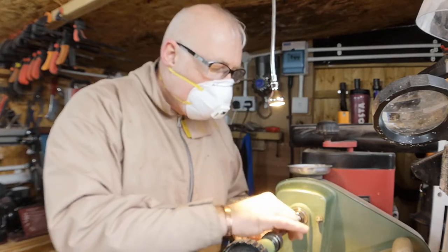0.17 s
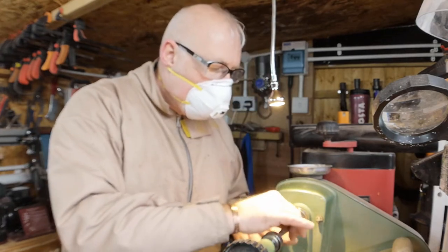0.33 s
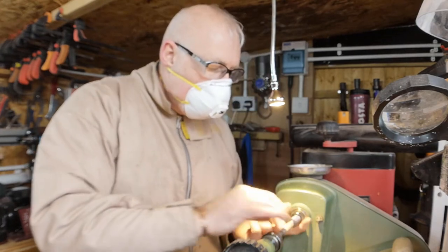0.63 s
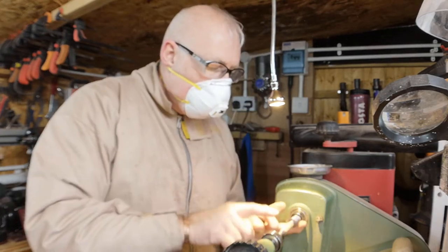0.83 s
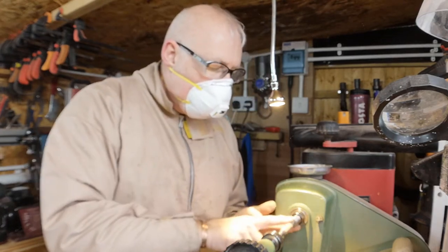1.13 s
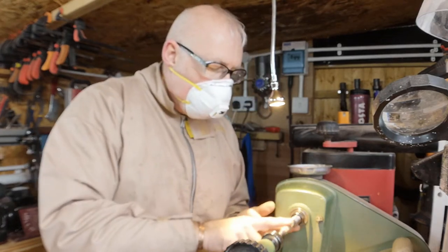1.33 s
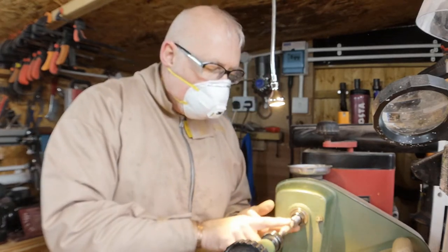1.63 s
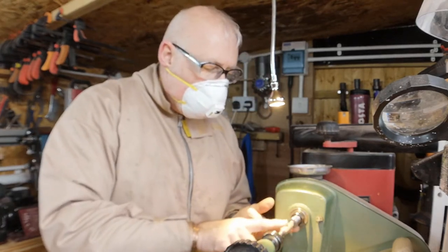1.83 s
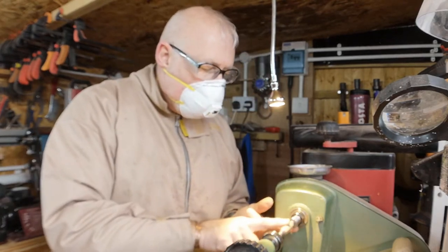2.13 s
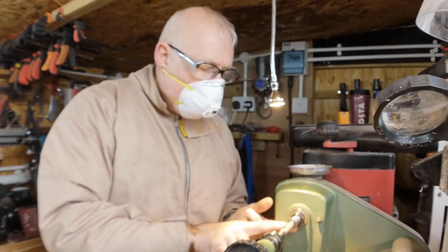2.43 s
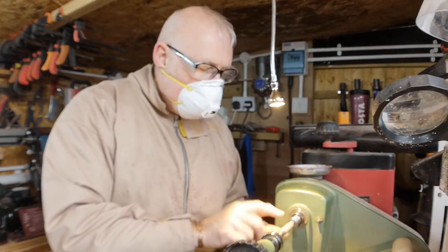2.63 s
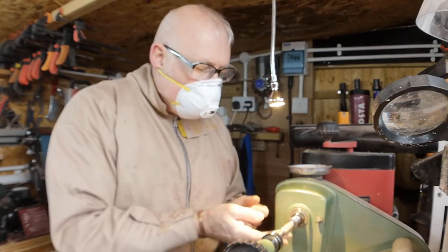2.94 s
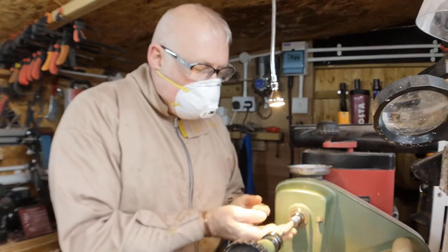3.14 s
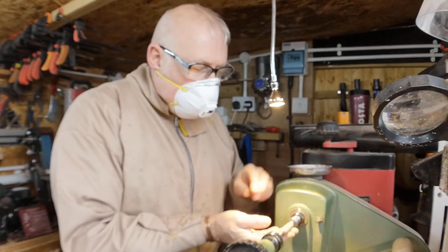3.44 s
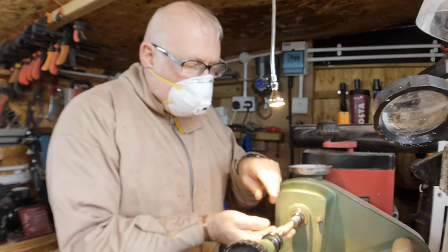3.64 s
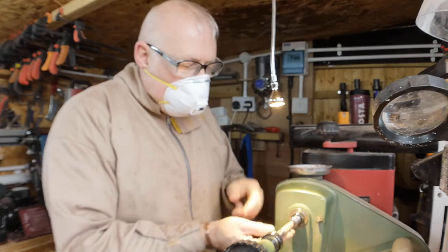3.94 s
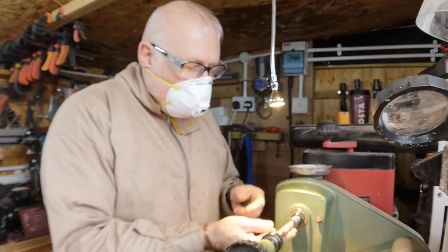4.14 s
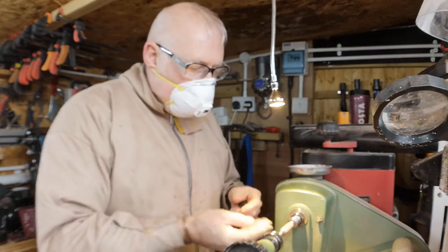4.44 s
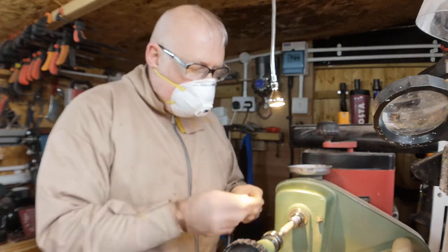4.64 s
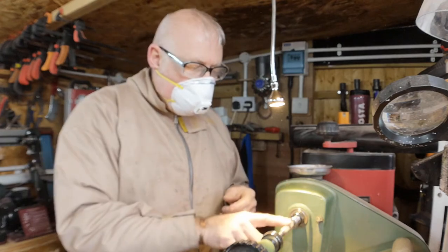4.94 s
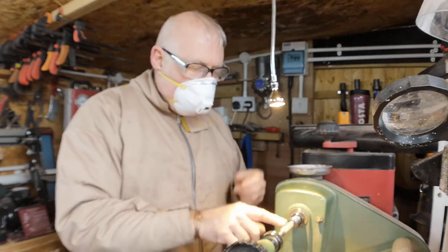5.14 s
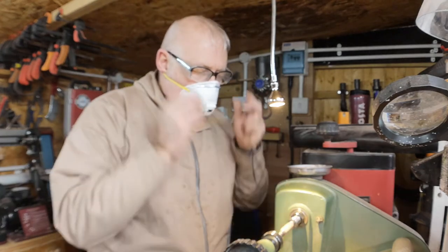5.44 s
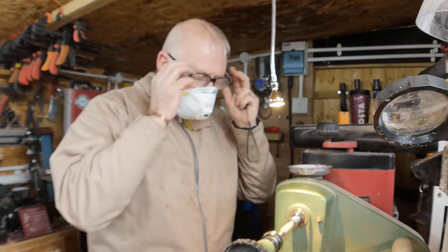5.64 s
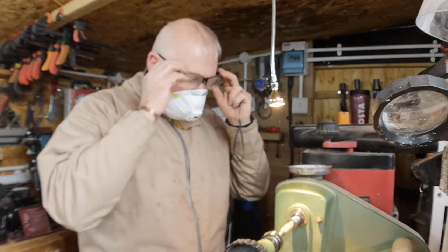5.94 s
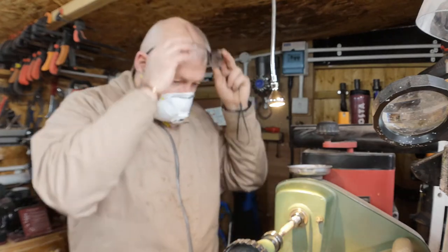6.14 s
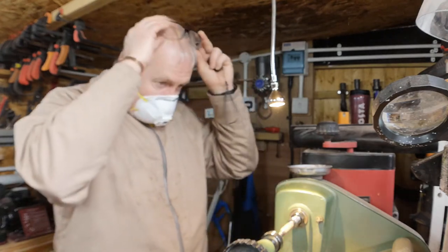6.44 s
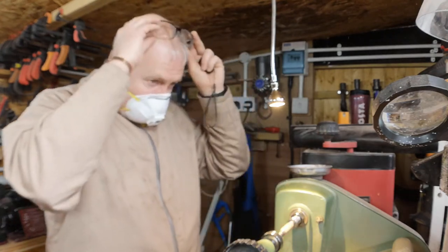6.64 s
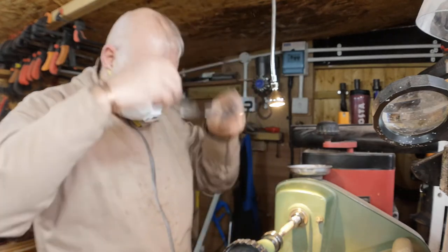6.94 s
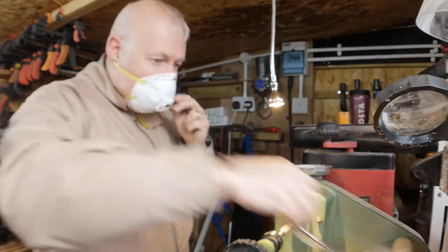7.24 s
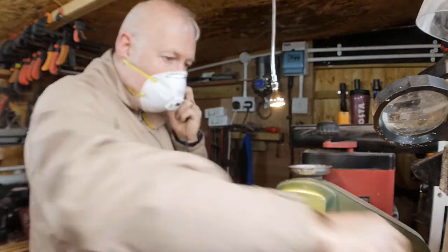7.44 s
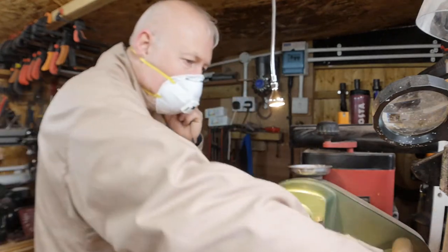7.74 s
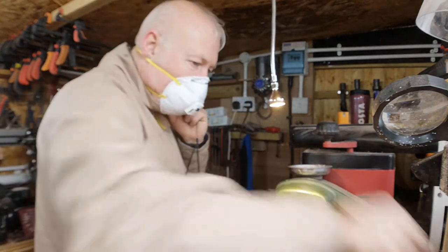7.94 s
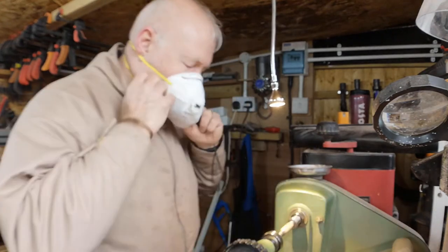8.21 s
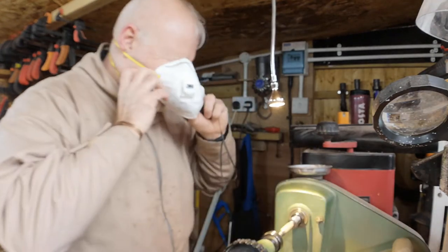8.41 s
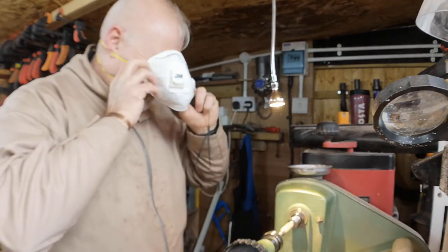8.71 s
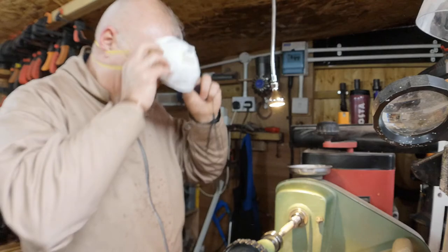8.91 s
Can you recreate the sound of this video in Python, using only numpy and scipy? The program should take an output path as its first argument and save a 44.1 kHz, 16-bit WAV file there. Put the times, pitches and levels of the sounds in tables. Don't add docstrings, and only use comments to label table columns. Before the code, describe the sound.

Quiet workshop: fingers faintly rub wood, a light tap, then spectacles come off, snap shut sharply and clatter onto a bench with dull bumps.

```python
import sys
import numpy as np
from scipy import signal
from scipy.io import wavfile

SR = 44100
rng = np.random.default_rng(int(sys.argv[2]) if len(sys.argv) > 2 else 0)


def digitize_waveform(pressure):
    field = np.atleast_2d(pressure).T
    bounded = np.clip(field, -1, 1)
    quanta = np.round(bounded * 32767).astype(np.int16)
    wavfile.write(sys.argv[1], SR, quanta)


def magnitude_from_level(level_db):
    exponent = np.asarray(level_db, float) / 20
    return 10 ** exponent


N = 399972

RUB_ZONES_HZ = [600, 2100, 7000, 13000]
# hz, level_db (per Hz)
RUB_COLOUR = [(150, -20), (250, -8), (400, -6.5), (640, -15), (922, 4.5), (1020, -8), (1120, -8.5),
              (2490, -1), (2910, -0.5), (3710, -14), (4050, 0.5), (8120, 5), (11700, -34), (13300, -26),
              (14600, -17), (15100, -19), (16000, -46)]
# hz, width_hz, level_db
HOUSING = [(1683, 204, 3), (3350, 47, -2), (3775, 71, 5.5), (5330, 200, 4), (5900, 190, 3), (7730, 340, 5)]
# time_s, level_db
SLEEVES = [(0, -72), (.35, -80), (1.25, -74), (1.6, -81.5), (2.8, -86.5), (2.97, -70.5), (3.3, -86),
           (3.5, -69.5), (3.9, -78.5), (4.06, -70), (4.4, -78.5), (5.2, -80), (5.5, -66), (6.25, -73.5),
           (6.7, -79), (7.6, -73), (8.14, -66), (9.07, -72)]
SLEEVE_ZONES_DB = [-7, 0, -3.5, -19]
# top_s, length_s, level_db
PASSES = [(.1, 0.17, -72.5), (.27, 0.15, -74), (0.437, .17, -73.5), (0.592, .22, -73.5), (1.27, 0.2, -74.5),
          (1.4, .12, -77.5), (1.52, .13, -76), (1.64, .13, -79), (1.77, .14, -79), (1.926, .16, -79),
          (2.06, .12, -79), (2.18, 0.14, -80), (2.32, .17, -80), (2.488, .16, -77.5), (2.95, .1, -77),
          (3.07, .13, -72), (3.226, 0.16, -75.5), (3.37, .11, -74.5), (3.507, .15, -69.5),
          (3.636, .14, -69.5), (3.78, .15, -72), (3.93, 0.14, -75.5), (4.03, 0.15, -72), (4.25, 0.1, -76.5),
          (4.43, .15, -73), (4.84, .16, -82), (4.99, .1, -80), (5.093, .11, -76), (5.198, .1, -79),
          (5.52, .3, -72)]
PASS_ZONES_DB = [-22, -10, 0, -10.5]
# start_s, length_s, level_db, brightness_db
STROKES = [(5.71, .13, -54.5, -13), (5.906, 0.09, -47, -3), (5.925, .085, -53.5, 0), (6.965, .045, -61, 1),
           (6.98, 0.082, -65, 7), (7.05, 0.077, -76.5, 9.5), (7.26, .05, -81.5, 10.5),
           (7.46, .11, -75, 9.5), (7.53, .15, -78, 10.5), (7.97, 0.11, -66.5, 5.5), (8.06, 0.087, -62, -1),
           (8.28, .06, -65, 1.5), (8.35, .085, -62, 8.5), (8.45, .1, -66, 6), (8.675, .12, -77, 9),
           (8.8, 0.058, -61, -5.5), (8.885, .17, -59, -.5)]
# start_s, length_s, level_db, brightness_db
DRAGS = [(2.93, .09, -72, -4), (5.76, 0.079, -67, 1), (7.672, 0.06, -60, -14), (7.703, 0.09, -51, -6),
         (7.772, 0.09, -48, 0), (7.81, .07, -56, -1), (7.84, .06, -66, 4), (7.985, .045, -63, 3),
         (7.886, 0.022, -50, -11), (7.905, 0.13, -51.5, -7), (8.62, 0.082, -55, -6.5), (8.99, .13, -68, 1)]
# start_s, length_s, pitch_hz, level_db
SQUEAKS = [(.0, .152, 5900, -75), (.34, .34, 5750, -74.5), (1.55, 1.0, 7630, -84.5),
           (2.416, .114, 7600, -80), (2.94, .05, 3400, -70), (3.543, .135, 7600, -80),
           (4.40, .046, 5070, -78), (4.37, .12, 7600, -79), (4.45, .03, 5500, -74),
           (5.052, .068, 11200, -84), (5.855, .04, 2250, -68), (6.82, .039, 2600, -75),
           (7.7, .08, 5930, -58), (7.8, .05, 920, -52), (7.8, .045, 1260, -53), (5.93, .05, 1150, -56),
           (5.76, .04, 980, -64), (7.16, .035, 850, -66)]
# start_s, length_s, centre_hz, level_db
SCUFFS = [(3.447, .116, 3500, -70.5), (5.755, .075, 2400, -55), (5.756, 0.086, 484, -66),
          (5.91, .082, 430, -55), (5.918, .075, 3600, -50), (5.92, .06, 2800, -52), (5.93, .055, 5300, -54),
          (5.765, .07, 5900, -62), (7.91, .035, 5200, -52), (7.755, .035, 2300, -55),
          (7.715, .075, 4600, -60), (7.885, .025, 6200, -58), (8.34, .1, 800, -74), (5.99, .05, 2600, -66),
          (7.76, .03, 10000, -62), (8.32, .2, 9400, -71), (8.42, .06, 7000, -68), (8.62, .16, 9100, -68),
          (8.87, .11, 9400, -72), (8.86, .06, 1500, -68), (8.68, .13, 430, -76), (8.36, .04, 2600, -62),
          (8.93, .12, 900, -68), (7.65, .04, 7800, -68), (3.03, .06, 2800, -73), (6.985, .065, 4800, -63),
          (7, .06, 3600, -66), (6.995, .05, 6800, -66), (7.79, .06, 1500, -59), (8.087, .023, 2700, -58.5),
          (8.485, 0.065, 924, -69), (8.629, .061, 319, -53.5), (8.93, .041, 970, -62),
          (7.154, 0.03, 14000, -45), (7.91, .026, 3180, -45), (8.366, .049, 5600, -62),
          (5.448, .246, 5600, -72.5)]

# time_s, peak_db, left_right_db
TAP = [
    (0.913, -34, -3),
]
# hz, level_db (per Hz)
TAP_COLOUR = [(150, -37), (250, -4), (559, -29), (829, -13), (1250, -24), (1670, -6), (2060, -7),
              (2610, -1.5), (3100, -12.5), (5650, -13), (6370, -20.5), (15000, -42)]
# pitch_hz, level_db, t60_s
TAP_MODES = [(800, -12, .11), (880, -12, .11), (1640, -10, .1), (1750, -6, .11), (2600, 0, .09),
             (2720, 1, .11), (3280, -9, .07), (5420, -9, .1), (5750, -8, .11), (6050, -12, .1),
             (7680, -14, .08)]
# time_s, peak_db, left_right_db
SNAP = [
    (7.156, -13.5, -2.5),
]
# hz, level_db (per Hz)
SNAP_COLOUR = [(180, -53), (300, -22.5), (378, -19), (599, -43), (846, -23), (1430, -22.5), (2090, -15),
               (2270, -26), (3660, -1.5), (4530, -16), (5700, 0), (9040, -2), (15300, -27)]
# pitch_hz, level_db, t60_s
SNAP_MODES = [(2090, -15, .08), (3700, -3, .16), (3790, -9, .12), (5550, -8, .12), (5680, -2, .15),
              (5930, -7, .12), (6650, -1, .1), (7170, -12, .09), (7800, 0, .09), (8050, -9, .11),
              (8860, -5, .07), (9350, -9, .07)]
RING_DB = {"tap": -5.5, "snap": -20}
# time_s, peak_db, left_right_db
DROP = [
    (7.907, -22, -6),
]
# hz, level_db (per Hz)
DROP_COLOUR = [(150, -21), (250, 8), (397, -3.5), (522, -8), (652, -1.5), (1650, -3.5), (4440, -20.5),
               (8520, -19.5), (10100, -38), (15000, -35.5)]
# pitch_hz, level_db, t60_s
DROP_MODES = [(517, 1.5, 0.1), (861, -6, .1), (1130, -4, 0.09), (1604, 0.5, 0.055), (2034, -2, 0.072),
              (2925, -7, 0.072), (4060, -20, 0.13), (5900, -18, 0.12), (7644, -24, 0.081),
              (7900, -31, 0.23), (8200, -13, 0.12)]
# time_s, peak_db, centre_hz, left_right_db
TICKS = [(1.929, -61, 1830, 10), (5.439, -49.5, 1390, 6), (5.86, -47, 2110, -4.0), (6.743, -56.5, 2200, 0),
         (6.791, -66, 5500, -12), (6.815, -53, 2900, -7), (6.842, -65, 7400, -12), (6.903, -54, 2700, -4),
         (6.968, -48, 4900, -9), (7.269, -59, 7890, 1), (7.668, -66, 918, -6.5), (7.688, -46, 1670, -7),
         (7.707, -45, 1700, -8), (7.721, -47, 1300, -8), (7.784, -45, 2960, -5), (7.887, -36, 1500, -6),
         (8.633, -50, 1560, -1), (8.646, -50, 1920, -8), (8.949, -54, 935, 1), (5.7747, -39, 2050, -1.5),
         (5.925, -45, 2900, -3.5), (6.968, -50, 2600, -7), (7.914, -38, 1300, -4), (7.925, -31, 1800, -4),
         (7.933, -36, 2500, -4), (8.01, -50, 1800, -4), (7.668, -61, 2400, -5), (4.007, -66, 4500, -3)]
# time_s, peak_db, pitch_hz, t60_s
PINGS = [(8.623, -59, 3750, .03), (8.632, -46, 1600, .04), (8.633, -55, 2800, .04), (8.644, -49, 2750, .06),
         (8.645, -46, 1950, .045), (8.648, -56, 3850, .03), (8.656, -49, 2000, .035),
         (8.664, -52, 1450, .04), (8.67, -48, 3780, .025), (8.682, -61, 1900, .04), (6.745, -67, 2300, .08),
         (6.79, -63, 5450, .025), (6.815, -60, 3500, .025), (6.817, -60, 2500, .1), (6.903, -60, 2700, .03),
         (6.967, -53, 6700, .015), (6.968, -56, 5300, .05), (6.968, -58, 8300, .025),
         (5.724, -61, 5800, .04), (5.766, -50, 1900, .04), (5.788, -50, 2500, .04), (5.81, -59, 5850, .06),
         (.91, -43, 2700, .05), (.918, -50, 1700, .09), (.935, -51, 1700, .06), (.925, -62, 4950, .11),
         (7.16, -49, 1620, .08), (7.162, -48, 2120, .07)]
# pitch_hz, level_db, t60_s
FRAME_MODES = [(5900, 0, .07), (7150, -3, .045), (8200, -2, .045), (2980, -2, .04), (1800, -2, .04)]
# time_s, level_db
FRAME_SLIPS = [(7.689, -63), (7.708, -54), (7.722, -48), (7.734, -50), (7.748, -59), (7.764, -53),
               (7.786, -54), (7.794, -54), (7.804, -52), (7.818, -58), (8.006, -61), (8.085, -64)]
# top_s, level_db, pitch_hz, t60_s
BUMPS = [(5.801, -34.5, 122, .11), (5.921, -42.5, 124, 0.32), (7.918, -40, 517, .13),
         (5.442, -63.5, 610, .031), (7.175, -59, 120, .3), (7.17, -64, 380, .092), (.962, -65, 351, 0.3),
         (.921, -48, 820, .08), (.919, -54, 1050, .07), (.93, -64, 230, .14), (.955, -69, 640, .12),
         (8.67, -55, 350, .07), (7.671, -60, 880, .04), (7.69, -58, 520, .06), (7.708, -56, 520, .06),
         (7.765, -53, 340, .06), (7.89, -44, 400, .05), (7.95, -42, 158, .15), (8.655, -56, 560, .05),
         (5.96, -46, 180, .13), (7.735, -48, 186, .12), (7.761, -40, 188, 0.2), (7.888, -40, 920, .05),
         (7.96, -50, 520, .2), (7.994, -33.5, 186, .13), (8.59, -55, 176, .11), (8.02, -40, 89, .24),
         (7.925, -36.5, 260, .083)]
# top_s, level_db, start_pitch_hz, t60_s
THUDS = [(5.964, -37, 121, 0.29), (7.19, -43.5, 58.3, 0.2), (1.9303, -42.5, 1500, .0016),
         (7.18, -50.5, 184.5, .19), (7.705, -45, 118.6, 0.1), (7.745, -45, 90, .12), (7.893, -42, 105, .07),
         (7.968, -42, 100, .08), (6.012, -49, 125, .12), (5.775, -45, 50, .1), (7.81, -48, 60.6, .17),
         (7.93, -35, 122, 0.3), (7.93, -36, 35.8, .29), (8.079, -40, 47, .12), (8.655, -42.5, 208, 0.07),
         (8.66, -44, 72, .12), (8.925, -46, 52.3, .065)]

# hz, level_db (per Hz)
RUMBLE_COLOUR = [(8.8, -29), (15, -3), (48, -5), (126, -22), (162, -30), (254, -31), (358, -39), (400, -34),
                 (520, -64), (880, -120)]
# time_s, air_db, traffic_db
SWAY = [(0, -5, 3), (1.3, -9, -1), (2.2, -1, -5), (3.6, 1, -4), (4.7, -4, -3), (6.7, -5, -2), (7.3, 1, -3),
        (9.07, -3, 0)]
# time_s, sway_db, knock_db
SHAKES = [
    (5.79, -55, -60),
    (5.94, -53.5, -62),
    (7.2, -59, -76),
    (7.92, -51.5, -48.5),
    (8.96, -61, -62.5),
]
# hz, level_db (per Hz)
HISS_COLOUR = [(150, -26), (250, -10), (573, -11), (931, -1.5), (1460, -4.5), (1680, -1.5), (3070, -5),
               (3710, -10), (4260, -19), (5530, -1.5), (6570, -11.5), (7680, -12.5), (10100, -22.5),
               (14600, -15), (15600, -23)]
# hz, likeness (0 to 1)
LIKENESS = [(60, .999), (130, .975), (280, .6), (700, .5), (1400, .28), (3000, .12), (15000, .02)]
# hz, left_right_db
LEAN = [(250, 0), (1300, -.5), (2400, -1.5), (4400, -4), (8100, -6.5), (15000, -.5)]


def rms_one(x):
    return x / np.sqrt(np.mean(x ** 2) + 1e-20)


def in_time(rows):
    s, *columns = np.transpose(rows)
    return [np.interp(np.arange(N) / SR, s, c) for c in columns]


def at_hz(points, hz):
    table_hz, value = np.array(points).T
    return np.interp(np.log(hz), np.log(table_hz), value)


def drift(rate_hz):
    r = np.exp(-80 * np.pi * rate_hz / SR)
    slow = signal.lfilter([1], [1, -2 * r, r * r], rng.standard_normal(N // 40 + 2002))[2000:]
    return np.interp(np.arange(N) / 40, np.arange(len(slow)), rms_one(slow))


def resonate(x, hz, width_hz):
    r = np.exp(-np.pi * width_hz / SR)
    poles = [1, -2 * r * np.cos(2 * np.pi * hz / SR), r * r]
    return signal.lfilter([(1 - r * r) / 2, 0, (r * r - 1) / 2], poles, x)


def bands(source, colour, count, near=0):
    edges = np.geomspace(colour[0][0], colour[-1][0], count + 1)
    for k, (low, high) in enumerate(zip(edges, edges[1:])):
        band_pass = signal.butter(2, [low, high], "band", fs=SR, output="sos")
        mid, side = signal.sosfilt(band_pass, source[k % 2])
        hz = np.sqrt(low * high)
        alike = np.clip(near + (1 - near) * at_hz(LIKENESS, hz), 0, .999)
        mid, side = np.sqrt(1 + alike) * mid, np.sqrt(1 - alike) * side
        lean = at_hz(LEAN, hz) / 2
        yield hz, magnitude_from_level(at_hz(colour, hz) + np.array([[lean], [-lean]])) * [mid + side, mid - side]


def add(out, sound, s, peak_db, pan_db):
    at = round(s * SR)
    sound = sound[:, :N - at] / np.abs(sound.mean(axis=0)).max()
    out[:, at:at + sound.shape[1]] += sound * magnitude_from_level(peak_db + np.array([[pan_db], [-pan_db]]) / 2)
    return out


def swell(start, top, end):
    t = np.arange(round(start * SR), min(round(end * SR), N)) / SR
    return round(start * SR), np.sin(np.pi / 2 * np.interp(t, [start, top, end], [0, 1, 0])) ** 1.5


def rubbing():
    grain_db = 2.2 * np.minimum(rng.exponential(1, N // 30 + 1), 3.5)
    grains = rng.standard_normal((2, 2, N)) * magnitude_from_level(grain_db).repeat(30)[:N]
    zones, shared = np.zeros((4, 2, N)), drift(23)
    for hz, band in bands(grains, RUB_COLOUR, count=16):
        nearest = np.argmin(np.abs(np.log(hz / np.array(RUB_ZONES_HZ))))
        flutter_db = 1.2 * (.6 * shared + drift(12))
        zones[nearest] += band * magnitude_from_level(flutter_db)
    rub = sum(rms_one(zone) * np.sqrt(power) for zone, power in zip(zones, contact_power()))
    return rub + sum(magnitude_from_level(db - 3.0) * resonate(rub, hz, width_hz) for hz, width_hz, db in HOUSING)


def contact_power():
    sleeve_db, = in_time(SLEEVES)
    power = magnitude_from_level(sleeve_db + np.array(SLEEVE_ZONES_DB)[:, None]) ** 2
    moves = [(top - length / 2, length, .5, db + np.array(PASS_ZONES_DB)) for top, length, db in PASSES]
    for rows, rise, body_db in ((STROKES, .4, -9), (DRAGS, .34, 1.5)):
        for s, length, db, bright_db in rows:
            zones_db = np.array([body_db - max(bright_db, 0), 0, bright_db, bright_db - 13.5])
            moves.append((s, length, rise, db + zones_db))
    for s, length, rise, zones_db in moves:
        at, shape = swell(max(s, 0), s + rise * length, s + length)
        power[:, at:at + len(shape)] += np.outer(magnitude_from_level(zones_db), shape) ** 2
    return power


def squeaks():
    out, warm_up = np.zeros((2, N)), SR // 8
    for rows, sharp in ((SQUEAKS, 19), (SCUFFS, 3.4)):
        for start, length, hz, db in rows:
            at, shape = swell(max(start, 0), start + length / 2, start + length)
            noise = rng.standard_normal((2, len(shape) + warm_up))
            tone = rms_one(resonate(resonate(noise, hz, hz / sharp), hz, hz / sharp))[:, warm_up:]
            out[:, at:at + len(shape)] += tone * np.sqrt(shape) * magnitude_from_level(db + np.array([[-2.5], [2.5]]))
    return out


def blow(event, modes, colour, crack_t60, tail_db, modes_db, rise_s, near):
    (s, peak_db, pan_db), t = event[0], np.arange(SR // 4) / SR
    sound = 0
    for hz, band in bands(rng.standard_normal((2, 2, len(t))), colour, count=18, near=near):
        room_t60 = 0.15 * (3000 / hz) ** .12
        sound = sound + band * (magnitude_from_level(-60 * t / crack_t60) + magnitude_from_level(tail_db - 60 * t / room_t60))
    sound = sound / np.abs(sound).max()
    for hz, db, t60 in modes:
        phase = rng.uniform(0, 2 * np.pi) + (1 - near) * rng.normal(0, 2.13, (2, 1))
        beat = 1 + .8 * np.cos(2 * np.pi * rng.uniform(30, 90) * t)
        sound = sound + magnitude_from_level(modes_db + db - 60 * t / t60) * beat * np.sin(2 * np.pi * hz * t + phase)
    return add(np.zeros((2, N)), sound * np.minimum(t / rise_s, 1), s - .0015, peak_db, pan_db)


def ticks():
    out, t = np.zeros((2, N)), np.arange(SR // 8) / SR
    for s, peak_db, hz, pan_db in TICKS:
        t60 = 0.08 * (2000 / hz) ** .15
        width_hz = hz / np.clip(2.08 * (hz / 2000) ** .35, .3, 12)
        noise = rng.standard_normal((2, len(t)))
        puff = noise * (magnitude_from_level(-60 * t / t60) * 0.54 + magnitude_from_level(-60 * t / 0.0067))
        rung = resonate(resonate(puff, hz, width_hz), hz, 2 * width_hz)
        edge = resonate(resonate(noise * magnitude_from_level(-60 * t / 0.008), hz, 2 * hz), hz, 2 * hz)
        tick = rung / np.abs(rung).max() + magnitude_from_level(-11) * edge / np.abs(edge).max()
        add(out, tick, s, peak_db, pan_db)
    return out


def pings():
    out, t = np.zeros((2, N)), np.arange(SR // 6) / SR
    rings = list(PINGS)
    for s, db in FRAME_SLIPS:
        for hz, mode_db, t60 in FRAME_MODES:
            slip_db = db + mode_db + 3 * rng.standard_normal()
            slip_hz = hz * (1 + .02 * rng.standard_normal())
            rings.append((s, slip_db, slip_hz, t60))
    for s, db, hz, t60 in rings:
        twin_hz, turn = hz + rng.uniform(60, 200), rng.uniform(0, 2 * np.pi, (2, 1))
        ring = np.sin(2 * np.pi * hz * t) + .5 * np.sin(2 * np.pi * twin_hz * t + turn)
        add(out, ring * np.minimum(t / .002, 1) * magnitude_from_level(-60 * t / t60), s, db, pan_db=-5)
    return out


def bumps():
    out = np.zeros(N)
    for rows, sag in ((BUMPS, .012), (THUDS, 0.211)):
        for s, db, start_hz, t60 in rows:
            rise = min(.33 * t60, .035, 4.16 / start_hz)
            t = np.arange(-round(rise * SR), SR // 3) / SR
            shape = np.where(t < 0, np.cos(np.pi / 2 * t / rise) ** 2, magnitude_from_level(-60 * t / t60))
            hz = start_hz * (1 - sag * (1 - np.exp(-np.maximum(t, 0) / 0.031)))
            at = round((s - rise) * SR)
            tone = np.sin(2 * np.pi * np.cumsum(hz) / SR)
            out[at:at + len(t)] += (magnitude_from_level(db) * shape * tone)[:N - at]
    return out


def rumble():
    t = np.arange(N) / SR
    deep_gain, upper_gain = magnitude_from_level(-61.5 - 0.63 * t), magnitude_from_level(-76)
    for s, db, upper_db in SHAKES:
        rise, after = np.clip(1 + (t - s) / 0.13, 0, 1) ** 2, np.maximum(t - s, 0)
        deep_gain = np.hypot(deep_gain, rise * magnitude_from_level(db - 60 * after / 2))
        upper_gain = np.hypot(upper_gain, rise * magnitude_from_level(upper_db - 60 * after / 0.79))
    sway_db, traffic_db = in_time(SWAY)
    parts = [band for hz, band in bands(rng.standard_normal((2, 2, N)), RUMBLE_COLOUR, count=8)]
    air = sum(band * magnitude_from_level(1.45 * drift(2.2)) for band in parts[:3]) * magnitude_from_level(sway_db)
    traffic = parts[3] * magnitude_from_level(traffic_db + 1.4 * drift(2.2))
    deep, upper = rms_one(air + traffic), rms_one(sum(parts[4:]))
    return deep * deep_gain * magnitude_from_level(2.5) + upper * upper_gain * magnitude_from_level(.5)


def hiss():
    noise = bands(rng.standard_normal((2, 2, N)), HISS_COLOUR, count=14)
    return magnitude_from_level(-73.25) * rms_one(sum(band * magnitude_from_level(0.82 * drift(3.1)) for hz, band in noise))


def scene():
    tap = blow(TAP, TAP_MODES, TAP_COLOUR, crack_t60=0.11, tail_db=-6,
               modes_db=RING_DB["tap"], rise_s=0.0045, near=0.16)
    snap = blow(SNAP, SNAP_MODES, SNAP_COLOUR, crack_t60=0.029, tail_db=-5.5,
                modes_db=RING_DB["snap"], rise_s=0.0016, near=0.43)
    drop = blow(DROP, DROP_MODES, DROP_COLOUR, crack_t60=0.088, tail_db=-9,
                modes_db=-9.5, rise_s=0.0058, near=0.63)
    air = rubbing() + squeaks() + tap + snap + drop + ticks() + pings() + hiss()
    solid = bumps() + rumble()
    left_lag = 27
    left = np.roll(air[0], left_lag) + np.roll(solid[0], left_lag // 2)
    return np.array([left, air[1] + solid[1]])


def top_cut(x):
    return signal.sosfilt(signal.butter(12, 16620, fs=SR, output="sos"), x)


def record(dry):
    steep = signal.ellip(10, .5, 60, 15650, fs=SR, output="sos")
    mix = signal.sosfilt(steep, dry)
    return top_cut(mix)


dry = scene()
out = record(dry)
digitize_waveform(out)
```